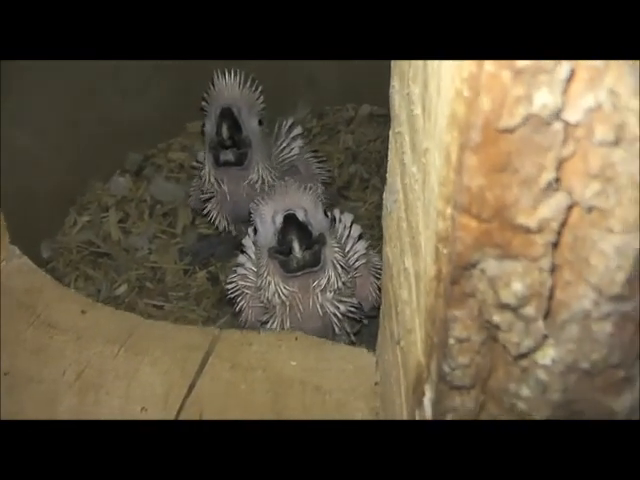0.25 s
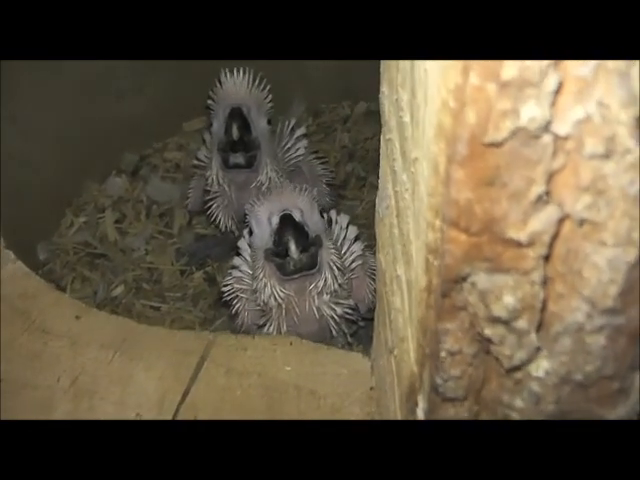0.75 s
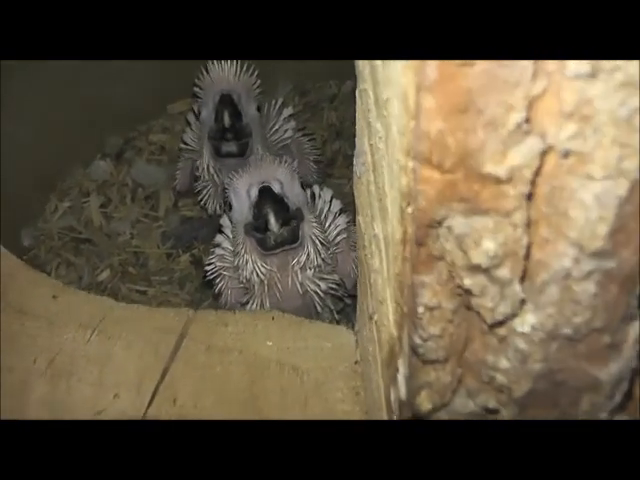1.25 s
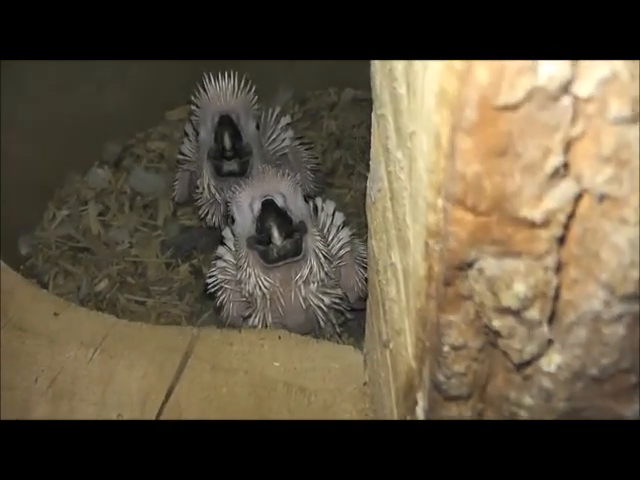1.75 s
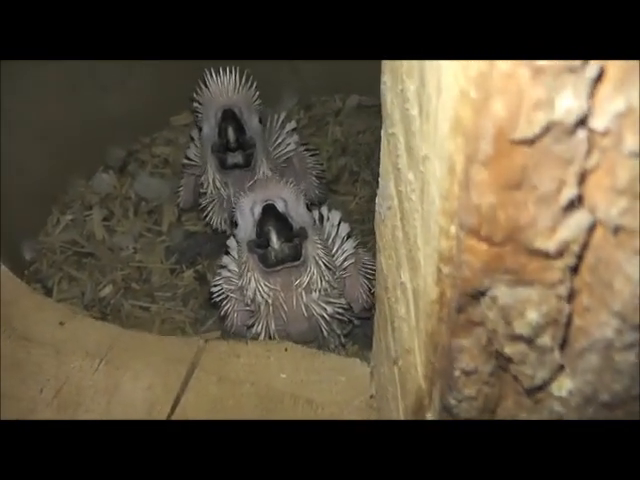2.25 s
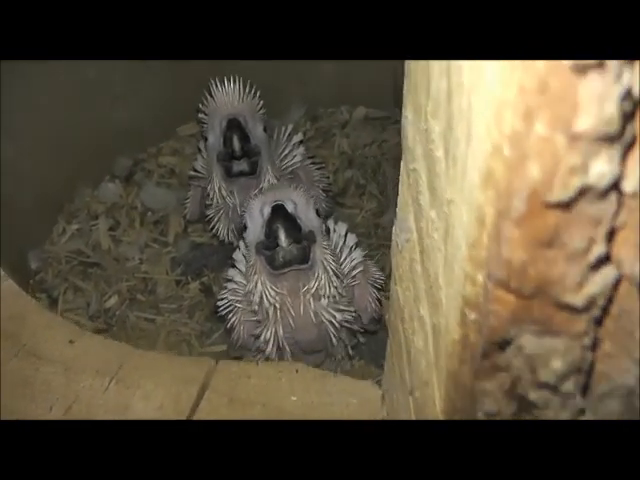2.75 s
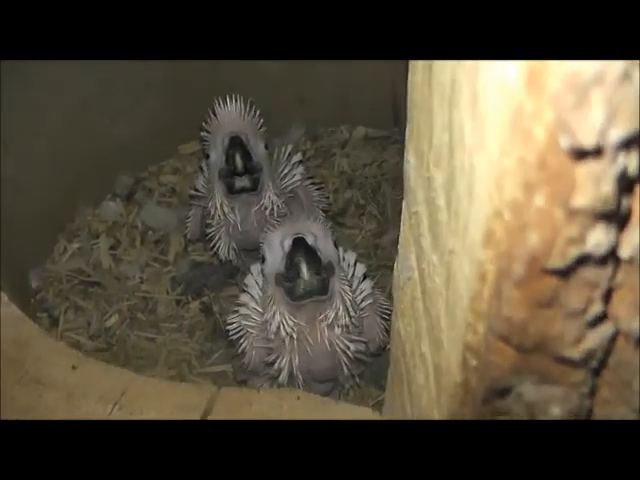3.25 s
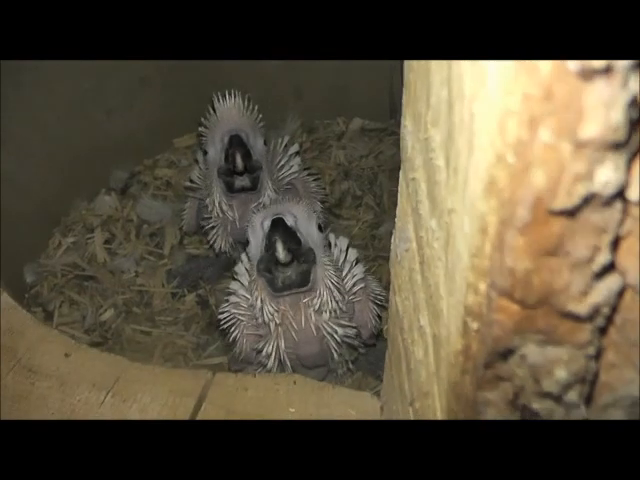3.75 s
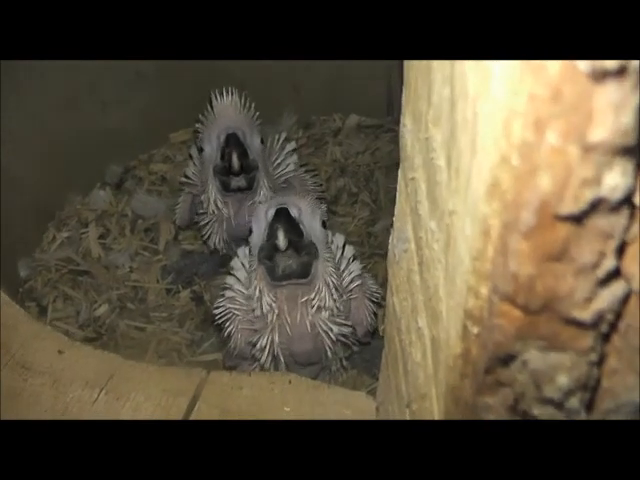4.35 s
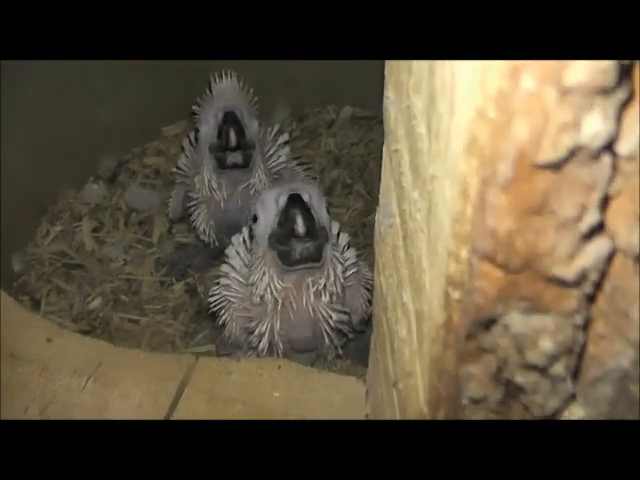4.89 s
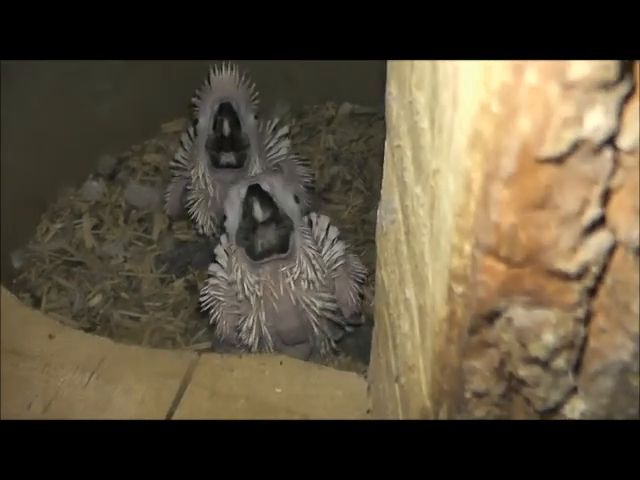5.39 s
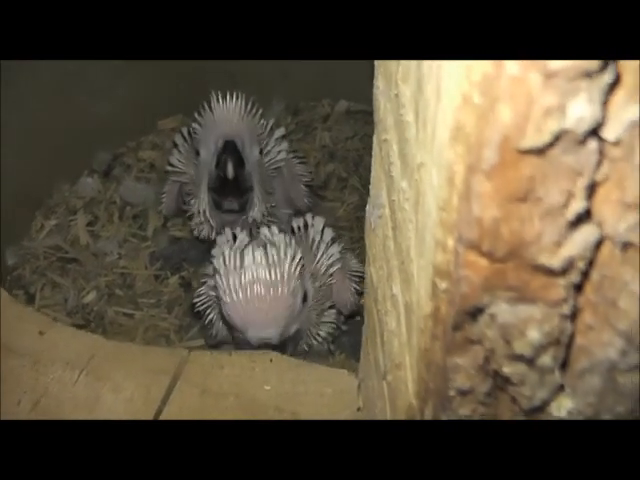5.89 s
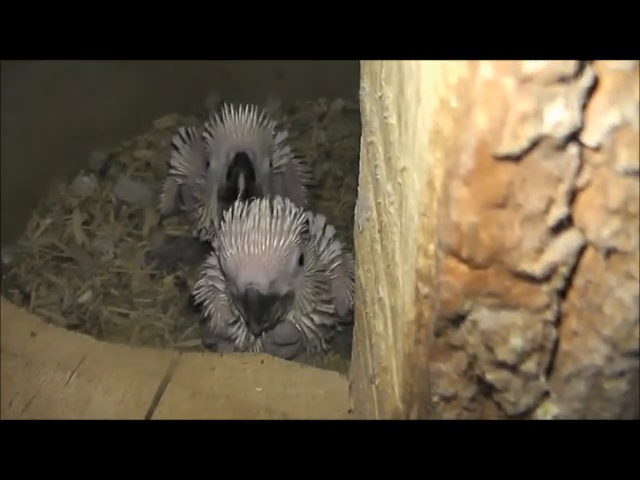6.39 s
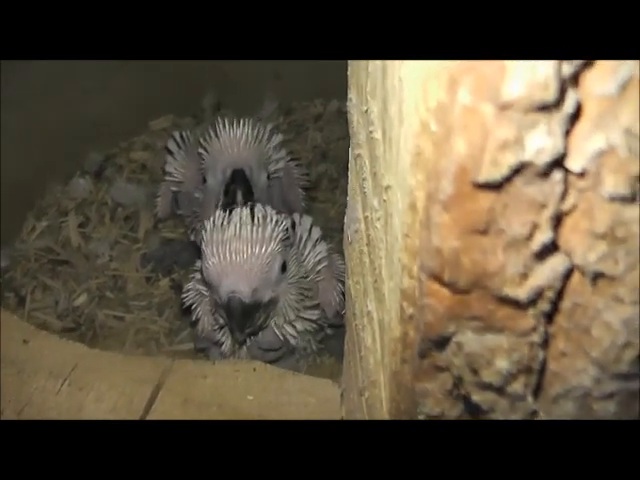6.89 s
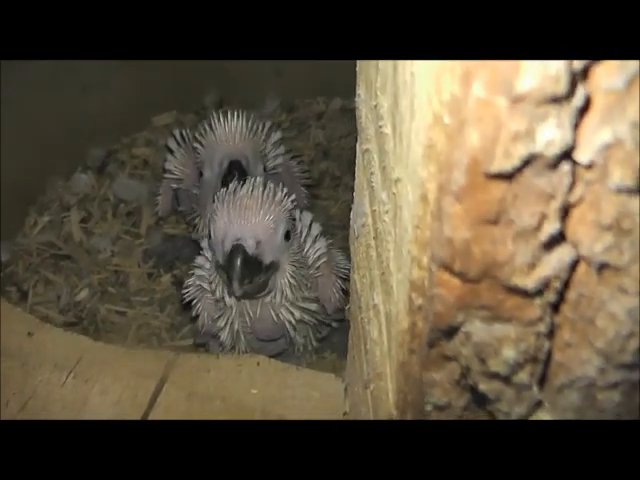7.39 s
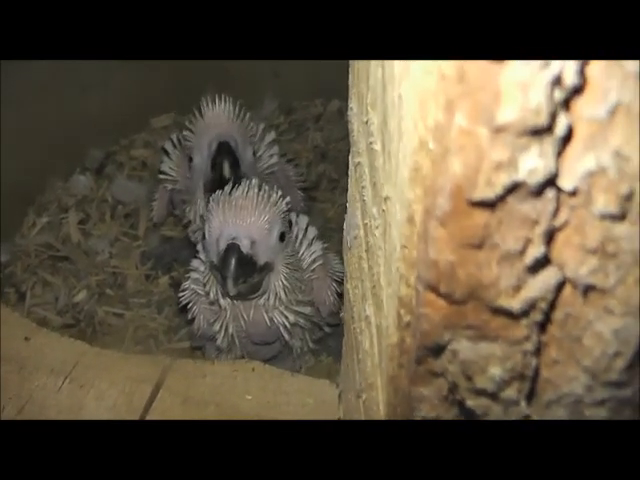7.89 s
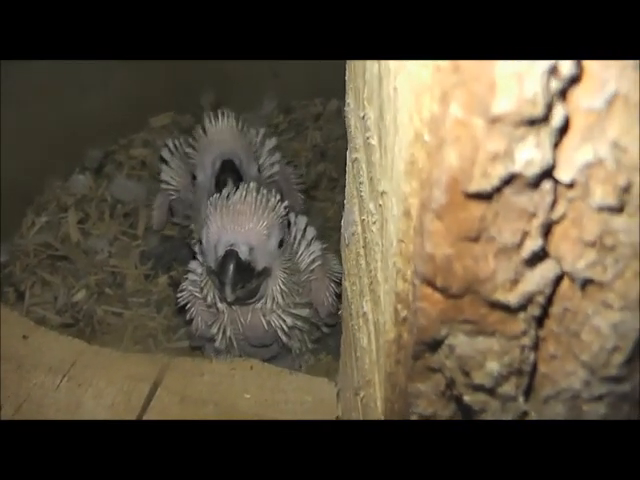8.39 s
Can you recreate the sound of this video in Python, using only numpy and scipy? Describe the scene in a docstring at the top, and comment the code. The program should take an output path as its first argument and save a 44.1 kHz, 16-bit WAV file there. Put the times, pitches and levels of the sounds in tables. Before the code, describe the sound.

Parrot chicks in a wooden nest box give three long, piercing, arched begging squeals, with small beak ticks, faint rustling and soft room air between.

```python
"""A murmur of air swells in a wooden nest box and a beak ticks; then cockatoo chicks beg, a little to the left.
Three long, arched squeals and one faint upward chirp: each a syrinx whistle, mostly a sine with overtones,
that scoops up, holds and drops away, split here and there by undertones or broken by noisy, uneven cycles.
Air and rustling bedding are shaped noise; ticks and clucks are noise bursts in resonances, and the room rings on.
A scuff, a dull knock, a soft lens motor, a low hum and a thin squeak lie between; loud calls duck it all."""
import sys
import numpy as np
from scipy import signal
from scipy.fft import rfft, irfft, next_fast_len
from scipy.io import wavfile
from scipy.ndimage import uniform_filter1d

SR = 44100
rng = np.random.default_rng(int(sys.argv[2]) if len(sys.argv) > 2 else 0)


def inscribe(sig):
    """Save sig as 16-bit PCM at rate SR to the path in sys.argv[1].

    A 1-D sig is mono; a 2-D sig holds one channel per row.
    Samples are clipped to [-1, 1] before scaling.
    """
    pcm = np.round(np.clip(np.atleast_2d(sig).T, -1, 1) * 32767)
    wavfile.write(sys.argv[1], SR, pcm.astype(np.int16))


N = 381024
TIME = np.arange(N) / SR


def from_db(db):
    """Decibels as an amplitude factor."""
    return 10 ** (np.asarray(db) / 20)


def rms_one(x):
    """Scale a sound to rms 1."""
    return x / np.sqrt(np.mean(x ** 2) + 1e-20)


def at_hz(points, hz):
    """Read a curve of (frequency, value) on a log-frequency axis."""
    points = np.array(points)
    return np.interp(np.log(np.maximum(hz, 1)), np.log(points[:, 0]), points[:, 1])


def during(start, end, edge_s=0.004):
    """1 between two times, with straight ramps centred on them."""
    return np.clip(np.minimum(TIME - start, end - TIME) / edge_s + .5, 0, 1)


def struck(events, decay_s):
    """Sum of sudden onsets (time [s], level [dB]) that each die away exponentially."""
    return sum(from_db(db) * (TIME >= s) * np.exp(-np.abs(TIME - s) / decay_s) for s, db in events)


def drift(hz):
    """Random wander up to about this rate: noise through two equal one-pole low-passes; rms 1."""
    r = np.exp(-2 * np.pi * hz / SR)
    wander = signal.lfilter([1], [1, -2 * r, r * r], rng.standard_normal(N + SR))
    return rms_one(wander[SR:])  # the first second lets the filter settle


def coloured(x, spectrum):
    """Filter a sound by this colour; rms 1."""
    size = next_fast_len(N)
    gain = from_db(at_hz(spectrum, np.fft.rfftfreq(size, 1 / SR)))
    return rms_one(irfft(rfft(x, size) * gain, size)[..., :N])


def wide_noise(spectrum):
    """Diffuse stereo noise, partly alike at the left and right microphone; rms 1."""
    # how alike the channels are: (frequency [Hz], correlation [0-1])
    likeness = [(60, 0.89), (150, 0.34), (380, 0.29), (950, 0.47), (2380, 0.67), (5980, 1), (15000, 0.32)]
    # tilt of the sound field: (frequency [Hz], left over right [dB])
    lean = [(60, 4), (130, 0), (290, -0.5), (640, -2.5), (1410, -1.0), (3100, -0.5), (6820, 0.5),
            (15000, -1)]
    size = next_fast_len(N)
    hz = np.fft.rfftfreq(size, 1 / SR)
    sides = np.array([[1], [-1]])
    mid, side = rfft(rng.standard_normal((2, size)))
    alike = np.clip(at_hz(likeness, hz), 0, 1)
    both = np.sqrt(1 + alike) * mid + np.sqrt(1 - alike) * side * sides
    gain = from_db(at_hz(spectrum, hz) + sides * at_hz(lean, hz) / 2)
    return rms_one(irfft(both * gain, size)[:, :N])


def air_and_bedding(low_db=-58.5, middle_db=-58, rustle_db=-66.5, grain_db=1.5):
    """A murmur of air and the fine rustle of quills on wood shavings: shaped noise with shared swell times."""
    # swells, added as power: (time [s], half width [s], low air [dB], middle air [dB], rustle [dB])
    swells = [(.13, .16, -57, -50, -61), (.65, .2, -60, -58, -63), (1.37, .17, -50, -49.5, -57.5),
              (1.9, .3, -54, -54, -72), (3.75, .2, -75, -53.5, -69), (4.8, .2, -70, -62, -65),
              (8.0, .6, -57, -70, -66)]
    # colours of the noise: (frequency [Hz], relative level [dB])
    low_air = [(20, -46), (35, -15), (55, -6.5), (85, -1.5), (130, -3), (160, 1.5), (210, -0.5), (300, -7),
               (450, -18.5), (900, -47)]
    mid_air = [(200, -25.5), (320, -7), (400, 1), (600, -3), (800, -3.5), (950, -7), (1200, -8.5),
               (1500, -15), (2300, -23), (4000, -48.5)]
    bedding_colour = [(900, 1), (2000, 0), (3200, -1), (4500, 0.5), (6500, -1), (8500, -7.5), (10000, -10),
                      (13000, -17.5), (15500, -18)]
    power = from_db([[low_db], [middle_db], [rustle_db]]) ** 2
    for s, width, *levels_db in swells:
        power = power + from_db(levels_db)[:, None] ** 2 * np.exp(-((TIME - s) / width) ** 2)
    low, middle, rustle = np.sqrt(power)
    air = low * wide_noise(low_air) + middle * wide_noise(mid_air)
    return air + rustle * from_db(grain_db * drift(70)) * wide_noise(bedding_colour)


def ticks(decay_s=0.0038, tick_db=-2.5, top_hz=9800):
    """A beak snaps: a very short crackle of noise sets its shell ringing."""
    # snaps: (time [s], relative level of the crackle [dB])
    snaps = [(0.1401, -46.5), (0.3805, -44), (1.273, -46), (1.2923, -46), (1.3538, -35.5), (1.8103, -53),
             (2.2382, -34.5), (4.6994, -45), (4.7917, -47.5), (4.887, -55.5), (5.0557, -33), (5.066, -39),
             (7.5294, -37.5), (8.5788, -49)]
    # resonances of the beak: (frequency [Hz], width [Hz], gain [dB])
    beak = [(2800, 230, 6), (4850, 970, -9), (7200, 1130, 6), (7940, 410, -8.5), (9300, 520, -29)]
    crackle = struck(snaps, decay_s) * rng.standard_normal(N)
    ringing = 0
    for hz, width, db in beak:
        resonance = signal.iirpeak(hz, hz / width, fs=SR)
        ringing = ringing + from_db(db) * signal.lfilter(*resonance, crackle + 1e-18)
    low_pass = signal.butter(6, top_hz, fs=SR, output="sos")
    return from_db(tick_db) * signal.sosfilt(low_pass, ringing)


def room(x, near_db=-15, tail_db=-17.0, t60_s=0.74, swell_s=0.014, spread=0.67):
    """Quick, faint echoes off the walls of the box, then the coloured, decaying ring of the room."""
    # colour of the ring: (frequency [Hz], gain [dB])
    room_colour = [(1500, 6), (2200, 2), (3000, 1.5), (3400, -3.5), (4000, 3.5), (7000, -6.5),
                   (12000, -6.5)]
    t = TIME[:SR]
    # noise common to both channels, plus some of each channel's own
    near, tail = rng.standard_normal((2, 1, SR)) + spread * rng.standard_normal((2, 2, SR))
    near = near * np.exp(-t / .004) * (t > .001)
    near = from_db(near_db) * near / np.linalg.norm(near[0])
    # the room takes a moment to answer through the entrance hole
    tail = tail * from_db(-60 * t / t60_s) * (1 - np.exp(-t / swell_s))
    gain = from_db(at_hz(room_colour, np.fft.rfftfreq(SR, 1 / SR)))
    tail = irfft(rfft(tail / np.linalg.norm(tail[0])) * gain)
    return signal.fftconvolve(x[None], near + from_db(tail_db) * tail, axes=1)[:, :N]


def begging():
    """Pitch, effort and overtones of the calls: scoop, hold and drop, under attack, swell and release."""
    # calls: (start [s], end [s], effort [dB], swell [dB/s], attack [s],
    #   second harmonic [dB], third harmonic [dB], share of the dead spots [0-1]); levels before colouring
    calls = [(.402, 1.011, -31.7, 2, .08, 3, -3, .55), (2.835, 2.925, -55.5, -130, .02, 2, -4, 0),
             (5.082, 6.14, -23.2, -1.5, .055, -2, -4.5, .9), (7.606, 8.26, -22.3, 12, .16, -1, -5, 1)]
    # held part of each call: (time [s], pitch [Hz])
    first_pitch = [(0.472, 2858), (0.49, 3401), (0.536, 3661), (0.558, 3646), (0.646, 4103), (0.708, 3981),
                   (0.734, 3497), (0.778, 3411), (0.786, 3743), (0.88, 3764), (0.918, 3672), (0.93, 2910),
                   (0.978, 2829), (0.995, 2696)]
    chirp_pitch = [(2.86, 2730), (2.92, 3800)]
    second_pitch = [(5.095, 3142), (5.129, 3017), (5.159, 3494), (5.179, 3593), (5.237, 3506),
                    (5.267, 3593), (5.305, 3394), (5.401, 3363), (5.507, 2819), (5.543, 2795),
                    (5.567, 2991), (5.597, 2760), (5.661, 2678), (5.761, 2895), (5.845, 2932),
                    (5.871, 3064), (5.979, 3222), (6.031, 3097), (6.059, 3155), (6.067, 2770),
                    (6.087, 2762), (6.118, 2478)]
    third_pitch = [(7.66, 2491), (7.666, 2608), (7.68, 3124), (7.72, 3730), (7.768, 3913), (7.814, 3968),
                   (7.9, 3822), (7.946, 3830), (8.002, 3707), (8.072, 3378), (8.166, 3417), (8.22, 3263)]
    # whistle strength by its pitch, overtone strength by overtone frequency: (frequency [Hz], gain [dB])
    whistle_colour = [(1500, -11), (2100, -6), (2500, -5), (2750, 0), (3300, 1), (4100, 0)]
    overtone_colour = [(3000, -13), (4500, -10), (5700, -23), (6800, -18), (7600, -18), (8200, -21),
                       (8800, -26), (9600, -39), (10300, -31), (10900, -28), (11400, -39), (12300, -33)]
    # standing waves in the box cancel the whistle: (frequency [Hz], half width [Hz], depth [dB])
    dead_spots = [(3110, 60, 6), (3430, 40, 9), (3775, 35, 8)]
    # brief dips where echoes in the box cancel the whistle: (time [s], half width [s], depth [dB])
    echo_dips = [(.489, .009, 15), (.55, .03, 3), (.79, .007, 8), (.832, .007, 8), (.898, .008, 5),
                 (5.142, .014, 7), (5.35, .07, 7), (5.6, .03, 6), (5.892, .014, 12), (5.93, .02, 4),
                 (6.028, .008, 12), (7.73, .03, 3), (8.056, .008, 9), (8.108, .01, 6), (8.16, .011, 6)]
    # the voice turns hard: (start [s], end [s], gain of the third harmonic [dB])
    shrill_start, shrill_end, shrill_db = (.785, .921, 24)
    scoop_hz_per_s, drop_hz_per_s = 18800, 32000
    attack_db, release_s, release_db = 15, .02, 18  # climb at the start, sinking at the end
    # overtones are strong in the scoop, weak once the whistle settles, then bloom again
    reedy_db, pure_db, settle_s, bloom_s = 3, -10, .035, .24

    sounding, pitch, effort_db, bright_db, edge_db, depth = np.zeros((6, N))
    for call, curve in zip(calls, (first_pitch, chirp_pitch, second_pitch, third_pitch)):
        start, end, level_db, swell_db, attack_s, second_db, third_db, share = call
        on = TIME >= start - .01  # holds until the next call takes over
        t = TIME[on]
        s, hz = np.transpose(curve)
        scoop = scoop_hz_per_s * np.maximum(s[0] - t, 0)
        drop = drop_hz_per_s * np.maximum(t - s[-1], 0)
        pitch[on] = np.interp(t, s, hz) - scoop - drop
        attack = np.clip(1 - (t - start) / attack_s, 0, 1)
        release = np.clip(1 - (end - t) / release_s, 0, 1)
        swell = swell_db * (np.minimum(t, end) - (start + end) / 2)
        effort_db[on] = level_db + swell - attack_db * attack - release_db * release
        bloom_db = np.interp(t - s[0], (0, settle_s, bloom_s), (reedy_db, pure_db, 0))
        bright_db[on] = second_db + bloom_db
        edge_db[on] = third_db + bloom_db
        depth[on] = share
        sounding += during(start, end)
    pitch = np.where(sounding > 0, np.maximum(pitch, 1500), 3000)  # 3000 Hz is only a silent placeholder

    dead_db = sum(db * np.exp(-((pitch - hz) / width) ** 2) for hz, width, db in dead_spots)
    echo_dip_db = sum(db * np.exp(-((TIME - s) / width) ** 2) for s, width, db in echo_dips)
    whistle_db = at_hz(whistle_colour, pitch) - depth * dead_db - echo_dip_db
    # overtones relative to the whistle, so that its dips leave them standing
    second_db = bright_db + at_hz(overtone_colour, 2 * pitch) - whistle_db
    third_db = edge_db + at_hz(overtone_colour, 3 * pitch) - whistle_db
    third_db = third_db + shrill_db * during(shrill_start, shrill_end)
    return sounding, pitch, effort_db + whistle_db, second_db, third_db


def straining(clear_db=-42.0, patchy_db=3.0, patchy_hz=90):
    """How hard the voice is forced: next to nothing while it is clear, in uneven fits during a rasp."""
    # the voice turns chaotic: (start [s], end [s], strain at the start [dB], strain at the end [dB])
    fits = [(.415, .464, 3, 2), (.55, .595, -18, -8), (.708, .725, -13, -15), (.777, .79, -12, -14),
            (.819, .824, -6, -6), (.858, .891, -17, -12), (.924, .984, 1, 1), (5.08, 5.11, -4, -18),
            (5.25, 5.33, -18, -19), (5.378, 5.469, -17, -8), (5.47, 5.628, -18, -4),
            (5.645, 5.68, -21, -22), (6.06, 6.098, 1, -1), (7.62, 7.665, -14, -14),
            (8.026, 8.103, -18, -18), (8.174, 8.255, -19, -13)]
    strain = from_db(clear_db)
    for start, end, first_db, last_db in fits:
        strain = strain + from_db(np.interp(TIME, (start, end), (first_db, last_db))) * during(start, end)
    return strain * from_db(patchy_db * np.clip(drift(patchy_hz), -2, 2))


def undertones(phase, pitch, wobble=.35):
    """Unsteady lines between the harmonics, where the syrinx repeats only every third or fourth cycle."""
    # split cycles: (start [s], end [s], cycles per repeat, level before colouring [dB])
    splits = [(0.534, 0.593, 3, -28), (0.722, 0.782, 3, -9.5), (5.26, 5.295, 3, -19),
              (5.29, 5.333, 4, -17.5), (8.046, 8.074, 3, -13), (8.172, 8.189, 3, -20.5)]
    # colour of the lines: (frequency [Hz], gain [dB])
    line_colour = [(1200, -33.5), (2400, -8), (3200, -8), (4500, 1), (5800, -5), (7000, -19.5), (8200, -1),
                   (9500, -31), (11400, -22.5), (15000, -33)]
    lines = np.zeros(N)
    slip = wobble * drift(270)  # phase wander [rad]
    for start, end, cycles, level_db in splits:
        gate = during(start, end)
        on = gate > 0
        for k in range(1, 4 * cycles):
            if k % cycles:  # whole harmonics are left to the whistle
                line = np.sin(k / cycles * (phase[on] + slip[on]) + k * k)
                line_db = level_db + at_hz(line_colour, pitch[on] * k / cycles)
                lines[on] += gate[on] * from_db(line_db) * line
    return lines


def rasp(phase, chaos, crackle_db=3.5):
    """Chaotic puffs, one a cycle: separate crackles under light strain, a dense screech under full strain."""
    # colours under light and full strain: (frequency [Hz], relative level [dB])
    throat_colour = [(900, -38.5), (1500, -24), (1800, -7.5), (2800, 4), (3800, 3.5), (5000, -9.5),
                     (6500, -10), (8300, -12.5), (9500, -37), (11400, -34.5), (15000, -56.5)]
    screech_colour = [(1000, -26), (1450, -23), (1720, 9), (2200, -9), (2800, -0.5), (3800, -5),
                      (5000, -2.5), (6500, -10), (8300, -25), (9500, -33), (11500, -12), (15000, -25)]
    lumps = from_db(crackle_db * np.clip(drift(260), -2, 2))
    puffs = rng.standard_normal(N) * (1 + np.cos(phase)) ** 2
    crackles = np.sqrt(1 - chaos ** 4) * coloured(puffs * lumps, throat_colour)
    return crackles + chaos ** 2 * coloured(puffs, screech_colour)


def squeals(waver=.0025, shimmer_db=1.0, jitter=.0015, rasp_jitter=.065, flutter=1.0, flutter_hz=230,
            rasp_noise_db=-5.5, overtone_db=2.5, fourth_db=-15.0, fifth_db=-17.5):
    """The syrinx whistles with overtones; under strain its cycles turn uneven in length and strength."""
    sounding, pitch, effort_db, second_db, third_db = begging()
    strain = straining()
    chaos = strain / np.hypot(1, strain)  # the share of the voice that is irregular
    pitch = pitch * (1 + waver * drift(25) + jitter * drift(100) + rasp_jitter * chaos * drift(700))
    phase = 2 * np.pi * np.cumsum(pitch) / SR
    # fourth and fifth harmonics are set relative to the third
    overtones_db = (second_db, third_db, third_db + fourth_db, third_db + fifth_db)
    # each overtone shimmers on its own as it glides through the resonances of the box
    overtones = 0
    for k, db in enumerate(overtones_db, 2):
        overtones = overtones + from_db(db + overtone_db * drift(35)) * np.sin(k * phase)
    tone = np.sin(phase) + (1 - chaos ** 2) * overtones + undertones(phase, pitch)
    whistle = np.sqrt(2) * tone / np.hypot(1, strain)
    # the strained voice also comes in uneven bursts a few milliseconds long
    bursts = np.cos(2 * np.pi * np.cumsum(flutter_hz * (1 + .7 * drift(150))) / SR)
    depth = flutter * np.minimum(chaos, .6)
    throb = (1 + depth * bursts) / np.sqrt(1 + depth ** 2 / 2)
    loudness = sounding * from_db(effort_db + shimmer_db * drift(35)) * throb
    return loudness * (whistle + from_db(rasp_noise_db) * chaos * rasp(phase, chaos))


def knock():
    """A dull knock on the wood: two decaying thuds of shaped noise."""
    # thuds: (time [s], level [dB], decay [s])
    thuds = [(1.923, -44.5, 0.011), (1.95, -53, 0.055)]
    # colour of the wood: (frequency [Hz], relative level [dB])
    knock_colour = [(200, -14), (600, 11), (1100, 6), (1800, -1), (3500, -6.5), (6000, -32), (12000, -43)]
    envelope = sum(struck([(s, db)], decay_s) for s, db, decay_s in thuds)
    return envelope * wide_noise(knock_colour)


def lens_motor():
    """The lens motor whirs softly: shaped noise that fades in and out."""
    # one whir: (start [s], end [s], level [dB])
    start, end, whir_db = (2.52, 3.26, -70)
    # colour of the motor: (frequency [Hz], relative level [dB])
    whir_colour = [(3500, -30), (4300, 4), (4700, 0), (5200, -17), (6800, -7), (7900, -1.5), (9000, 0.5),
                   (9400, -24)]
    return during(start, end, edge_s=.08) * from_db(whir_db) * wide_noise(whir_colour)


def clucks(cluck_hz=2200, width_hz=1000, decay_s=.007):
    """Short clucks before the chirp: single puffs of noise, coloured twice by a resonance of the throat."""
    # puffs: (time [s], level at the onset [dB])
    cluck_puffs = [(2.76, -50), (2.797, -45), (2.823, -51)]
    throat = signal.iirpeak(cluck_hz, cluck_hz / width_hz, fs=SR)
    once = signal.lfilter(*throat, rng.standard_normal(N))
    return struck(cluck_puffs, decay_s) * rms_one(signal.lfilter(*throat, once))


def scuff():
    """A soft scuff as a chick shifts: flickering noise that starts at once and fades steadily."""
    # one scuff: (start [s], length [s], level [dB], fading [dB/s])
    start, length, scuff_db, fade_db = (5.295, .23, -39, 58)
    # colour of the scuff: (frequency [Hz], relative level [dB])
    scuff_colour = [(300, -20), (650, -8), (1100, -2.5), (1600, -8.5), (2400, -14), (4000, -33.5)]
    fading_db = scuff_db - fade_db * np.abs(TIME - start) + 2.5 * drift(120)
    return during(start, start + length) * from_db(fading_db) * wide_noise(scuff_colour)


def faint_tone(start, end, hz, db, waver=0.0083, flicker_db=2.5, fade_s=.07):
    """An unsteady sine that fades in and out."""
    phase = 2 * np.pi * np.cumsum(hz * (1 + waver * drift(40))) / SR
    return during(start, end, fade_s) * from_db(db + flicker_db * drift(25)) * np.sqrt(2) * np.sin(phase)


def hum_and_squeak():
    """A faint low hum comes twice near the end, a thin squeak once: wavering sines."""
    # tones: (start [s], end [s], frequency [Hz], level [dB])
    hums = [(7.35, 7.87, 158, -60), (8.2, 8.7, 180, -60)]
    squeak = (7.45, 7.58, 5200, -69)
    return sum(faint_tone(*row) for row in hums) + faint_tone(*squeak)


def scene(voice_left_db=2.0):
    """The chicks' direct sound a little to the left, their ring in the room, and everything around them."""
    chicks = ticks() + squeals() + clucks()
    direct = chicks * from_db(voice_left_db * np.array([[.5], [-.5]]))
    small_sounds = knock() + lens_motor() + scuff() + hum_and_squeak()
    return air_and_bedding() + direct + room(chicks) + small_sounds


def record(dry, threshold_db=-24.0, squeeze=0.28, release_db_per_s=12.5, cutoff_hz=15350):
    """Gain control ducks everything at once under loud calls and recovers steadily; the top is cut steeply."""
    power = uniform_filter1d(np.mean(dry ** 2, axis=0), size=200)
    level_db = 10 * np.log10(np.maximum(power, 1e-12))
    over_db = squeeze * np.maximum(level_db - threshold_db, 0)
    # the duck holds its peak, less a steady release
    released_db = release_db_per_s * TIME
    duck_db = np.maximum.accumulate(over_db + released_db) - released_db
    low_pass = signal.ellip(10, .1, 90, cutoff_hz, fs=SR, output="sos")
    return signal.sosfilt(low_pass, dry * from_db(-duck_db))


dry = scene()
out = record(dry)
inscribe(out)
```